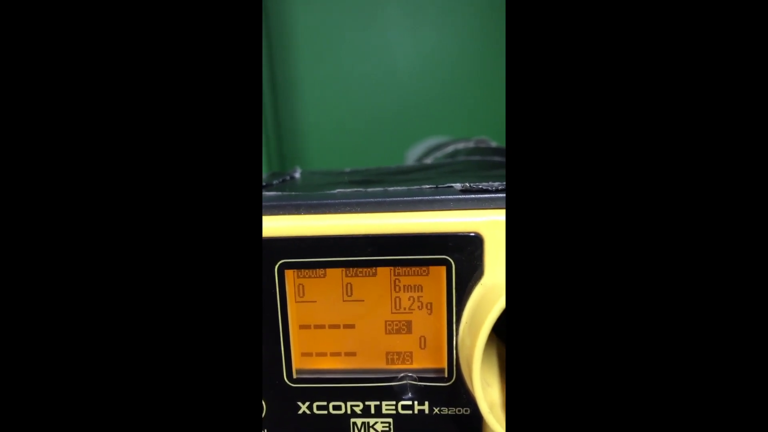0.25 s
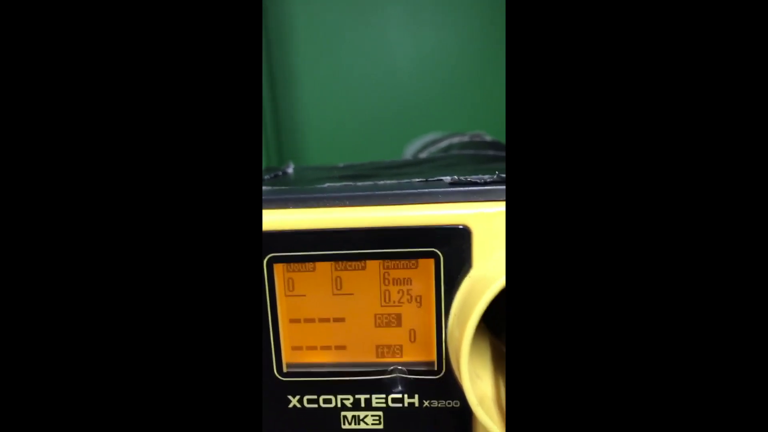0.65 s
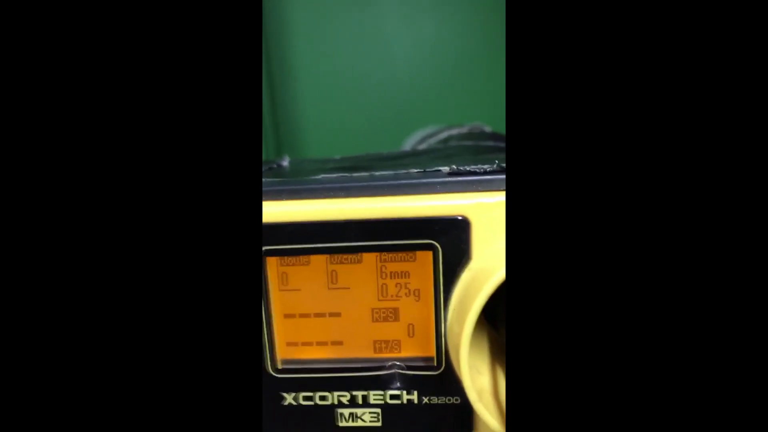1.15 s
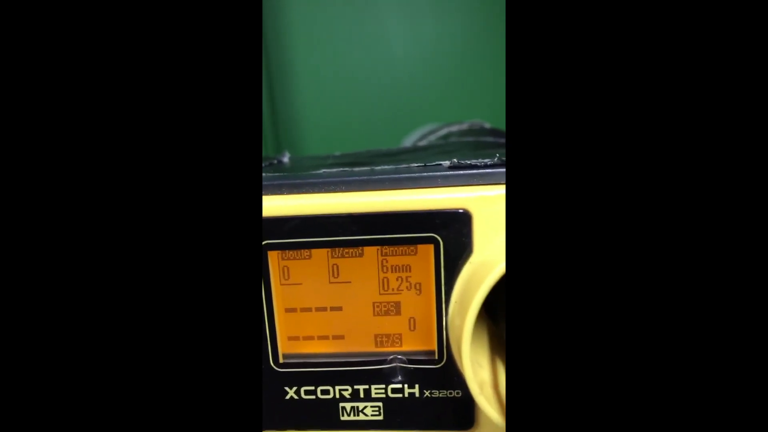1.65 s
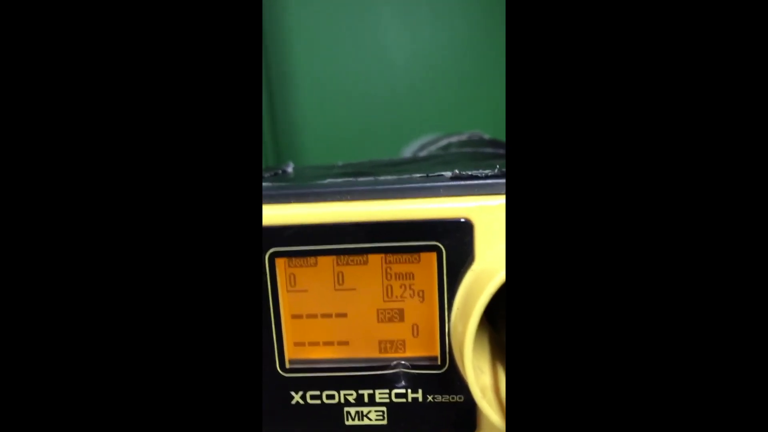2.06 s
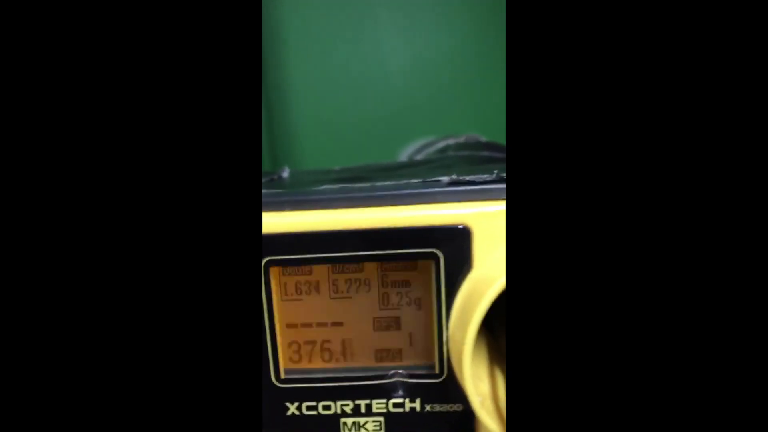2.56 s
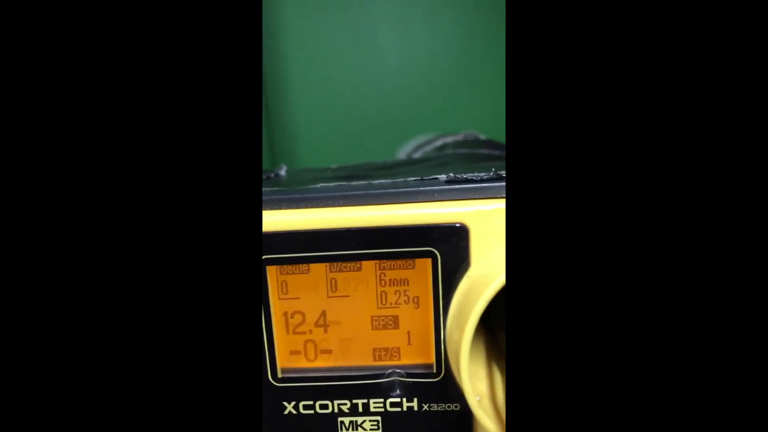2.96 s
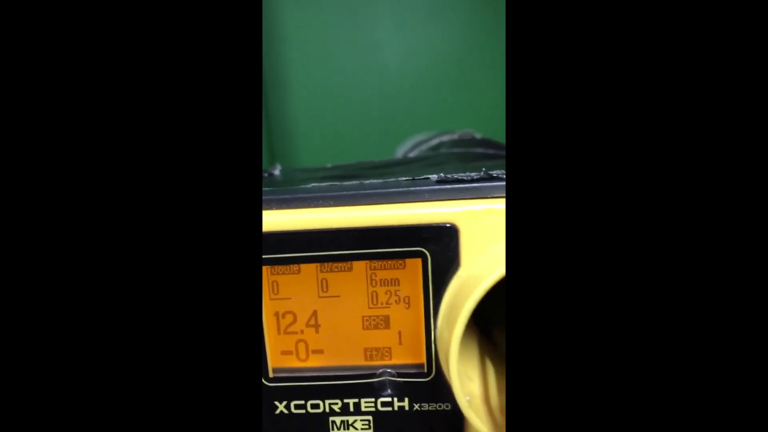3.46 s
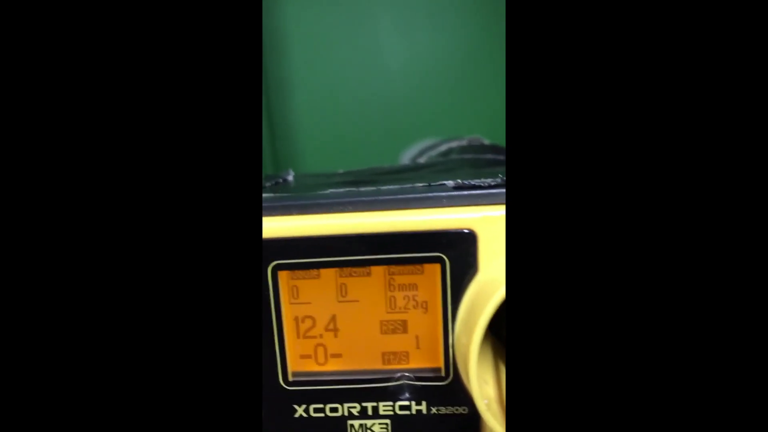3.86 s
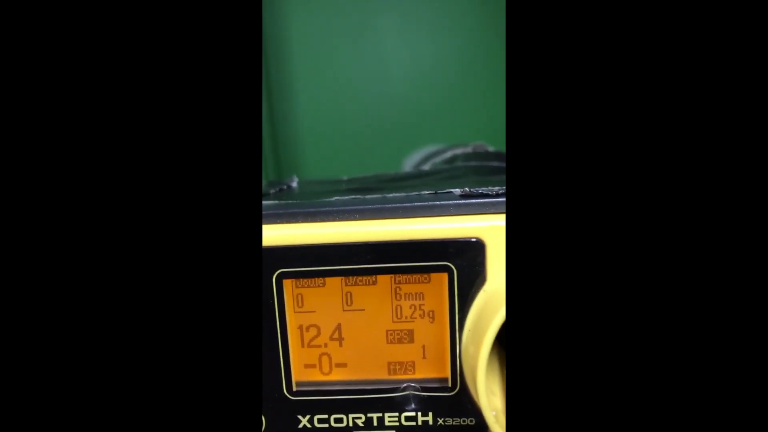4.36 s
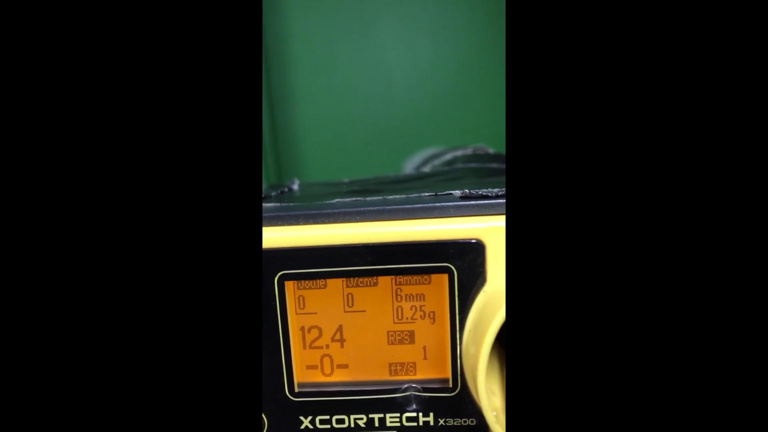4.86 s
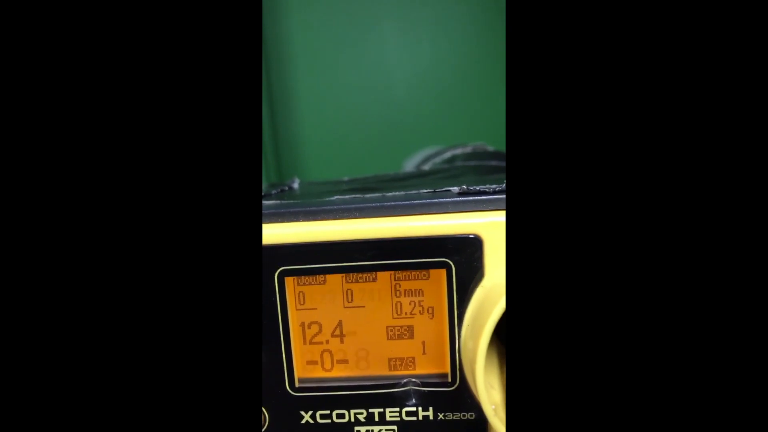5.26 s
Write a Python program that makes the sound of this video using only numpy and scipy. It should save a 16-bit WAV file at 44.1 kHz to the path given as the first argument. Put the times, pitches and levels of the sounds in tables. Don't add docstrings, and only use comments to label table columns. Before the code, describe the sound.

A quiet indoor space holds soft, uneven low rumble and muffled air. From 0 to 1.2 s, an electric pellet rifle is handled: tiny ticks and dull knocks, clearest at about 0.75 and 0.88 s. At 1.95 s the motor engages with a gritty whir and a hard clack, then from 2.04 to 2.56 s eight evenly spaced shots hammer out, about fourteen per second, each a dry piston slam with a short air blast and low buffeting that overloads the close camera microphone. The motor stops by 2.64 s and the background dips, then slowly returns. Between 2.85 and 3.4 s pellets faintly rattle and ping in a metal trap. Clicks and a sharp plastic snap come around 3.73-3.87 s. After quiet rumble, the motor jerks at 5.0 s and one loud crack lands at 5.05 s, followed by a low thump, another dip, faint ringing and a tiny pellet tick at 5.5 s.

```python
import sys
import numpy as np
from scipy import signal
from scipy.fft import rfft, irfft
from scipy.io import wavfile
from scipy.ndimage import uniform_filter1d

SR = 44100
rng = np.random.default_rng(int(sys.argv[2]) if len(sys.argv) > 2 else 0)


def to_linear_factor(level_db):
    exponent = np.asarray(level_db, float) / 20
    return 10 ** exponent


def unload_audio(sound):
    columns = np.transpose(np.atleast_2d(sound))
    steps = np.round(np.clip(columns, -1, 1) * 32767)
    wavfile.write(sys.argv[1], SR, steps.astype(np.int16))


N = 243431


def evened(x):
    return x / np.sqrt(np.mean(x ** 2) + 1e-20)


def read(points, hz):
    f, value = np.transpose(points)
    return np.interp(np.log(hz + 1), np.log(f + 1), value)


def add(mix, s, sound):
    part = mix[round(s * SR):][:len(sound)]
    part += sound[:len(part)]


def coloured(x, points):
    return evened(irfft(rfft(x) * to_linear_factor(read(points, np.fft.rfftfreq(len(x), 1 / SR))), len(x)))


def resonate(x, hz, width_hz):
    turn = np.exp(2j * np.pi * np.cumsum(hz * np.ones(len(x))) / SR)
    r = np.exp(-np.pi * width_hz / SR)
    return 2 * (turn * signal.lfilter([1 - r], [1, -r], x / turn)).real


def wobble(count, span):
    return evened(uniform_filter1d(uniform_filter1d(rng.standard_normal(count), span), span))


def tail(points, modal_db=3.5):
    # f/Hz, t60/s
    room_t60 = [(100, 0.21), (260, 0.39), (700, 0.32), (1840, 0.34), (4850, 0.24)]
    late_db, late_t60_s = -40.5, 1.5
    spectrum = rfft(coloured(rng.standard_normal(SR // 2), points))
    modes = to_linear_factor(modal_db * np.clip(wobble(len(spectrum), span=25), -1, 1))
    hz, t, z = signal.stft(evened(irfft(spectrum * modes)), SR, nperseg=256)
    fade = to_linear_factor(-60 * t / read(room_t60, hz)[:, None]) + to_linear_factor(late_db - 60 * t / late_t60_s)
    return signal.istft(z * fade, SR, nperseg=256)[1]


def shot(slam_db, blast_db, length_s, buffet_db, echo_db):
    # f/Hz, width/Hz, level/dB
    slam_modes = [(3070, 500, -0.5), (6800, 240, -12.5), (8840, 290, -10.5)]
    # f/Hz, level/dB
    blast_spectrum = [(180, -34), (300, -1), (2350, -3.5), (4520, -4), (5000, -10.5), (5370, -5.5),
                      (7720, -12), (8930, -8), (9600, -22), (12500, -48), (21100, -120)]
    # f/Hz, level/dB
    echo_spectrum = [(88, -47), (150, -15), (257, -15), (965, -4.5), (1390, -11), (3100, -3.5),
                     (4160, -7.5), (6110, -1.5), (8800, -1.5), (9600, -17.5), (12500, -46), (21100, -120)]
    hiss_s = 0.022
    t = np.arange(SR // 2) / SR
    noise = rng.standard_normal((3, len(t)))

    def knock(at_s, hold_s):
        return np.exp(-((t - at_s) / hold_s) ** 4)

    def shut(at_s):
        return 1 / (1 + np.exp(np.clip((t - at_s) / 0.001, -50, 50)))

    body = sum(to_linear_factor(db) * evened(resonate(noise[0], hz, w)) for hz, w, db in slam_modes) + 0.3 * noise[0]
    slam = evened(body) * (knock(.0014, .0019) + .8 * knock(.0052, .0008))
    flutter = to_linear_factor(2.3 * wobble(len(t), span=45))
    blast = coloured(noise[1], blast_spectrum) * shut(hiss_s) * np.clip((t - .0065) / 0.0019, 0, 1) * flutter
    gusts = evened(resonate(noise[2], 400, 710)) + evened(resonate(noise[2], 60, 100))
    coarse = 0.56 * evened(resonate(noise[2], 600, 400)) * np.clip(t / length_s, 0, 1) ** 2
    gusts = evened(gusts) + coarse
    buffet = gusts * shut(length_s) * np.clip(t / 0.00098, 0, 1)
    echo = tail(echo_spectrum)[:len(t)] * np.clip(t / 0.011, 0, 1) * (1 + 0.98 * np.exp(-t / 0.016))
    return to_linear_factor(slam_db) * slam + to_linear_factor(blast_db) * blast + to_linear_factor(buffet_db) * buffet + to_linear_factor(echo_db) * echo


def motor(rows, fired_s):
    # f/Hz, level/dB
    gearbox = [(88, -42.5), (150, -13), (481, -10.5), (583, -5.5), (965, -10.5), (1130, -10), (1710, -5.5),
               (3040, -5.5), (6430, -14.5), (8800, -11.5), (9600, -29.5), (12500, -56.5), (21100, -120)]
    # f/Hz, width/Hz, level/dB
    casing = [(991, 25, -3), (3050, 37, 2.5), (3310, 53, -4), (4250, 370, -9), (5260, 26, -10.5),
              (6450, 36, -13.5), (7900, 71, -11.5), (9100, 47, -13.5)]
    # shaft multiple, level/dB
    orders = [(3, -16), (4, -12.5), (9, -8), (10, 1), (14, -17.5), (16, -12.5), (20, -15), (36, -16.5)]
    load_lead_s, load_s, load_db, load_sag = 0.012, 0.014, 8, .04
    s, *columns = np.transpose(rows)
    t = np.arange(s[0], s[-1], 1 / SR)
    gear_db, speed_hz, whine_db = (np.interp(t, s, c) for c in columns)
    load = sum(np.exp(-((t - at + load_lead_s) / load_s) ** 2) for at in fired_s)
    turns = np.cumsum(speed_hz * (1 - load_sag * load + .009 * wobble(len(t), span=100))) / SR
    once_a_turn = 1.3 + np.exp(-(turns % 1) / 0.34)
    chatter = rng.standard_normal(len(t)) * once_a_turn * to_linear_factor(0.9 * wobble(len(t), span=40))
    shell = sum(to_linear_factor(db) * evened(resonate(chatter, hz, 0.83 * w)) for hz, w, db in casing)
    gears = coloured(chatter, gearbox) + .5 * evened(shell)
    whine = 0
    for k, db in orders:
        level = to_linear_factor(db + 2.7 * wobble(len(t), span=200))
        whine = whine + level * np.cos(2 * np.pi * (k * turns + rng.random()))
    return s[0], to_linear_factor(gear_db) * evened(gears) + to_linear_factor(whine_db + load_db * load) * whine


def pull(turning, shots):
    brake_s, brake_db = 0.037, -32
    opening_blast_s, later_blast_s = .033, 0.026
    echo_settled_db, fresh_echo_db, duck_s = -18.5, 4, .1
    s, gear_db, speed_hz, whine_db = turning[-1]
    braked = turning + [(s + brake_s, gear_db + brake_db, speed_hz, whine_db + brake_db)]
    sounds = [motor(braked, [row[0] for row in shots[1:]])]
    for s, slam_db, blast_db, buffet_db in shots:
        since_s = s - shots[0][0]
        echo_db = echo_settled_db + fresh_echo_db * np.exp(-since_s / duck_s)
        length_s = later_blast_s if since_s else opening_blast_s
        sounds.append((s, shot(slam_db, blast_db, length_s, buffet_db, echo_db)))
    return sounds


def firing(mix):
    # t/s, gear noise level/dB, shaft speed f/Hz, pinion whine level/dB
    motor_runs = [
        [(1.945, -43.5, 250, -58), (1.951, -28, 290, -27), (1.984, -12.5, 275, -24), (1.995, -17, 239, -13),
         (2.02, -16, 236, -8.5), (2.04, -13, 215, -33), (2.11, -21.5, 240, -34), (2.27, -39, 267, -43),
         (2.6, -32, 245, -42)],
        [(4.992, -42.5, 250, -58), (4.998, -23, 190, -33.5), (5.018, -19.5, 260, -17), (5.03, -13, 300, -35.5),
         (5.048, -15, 330, -20), (5.08, -19.5, 570, -36), (5.11, -31, 450, -44.5)],
    ]
    # t/s, slam level/dB, air blast level/dB, buffeting level/dB
    shot_runs = [
        [(2.0445, -2.5, -12, -11.5), (2.1195, -1.2, -5.5, -13.5), (2.1925, -5, -8.5, -10.5),
         (2.2655, -4, -7.5, -11), (2.3388, -4, -8, -13), (2.4118, -3, -7.5, -9.5), (2.4855, -6, -7, -15.5),
         (2.5578, -2, -9.5, -12.5)],
        [(5.0502, -0.2, -11, -15.5)],
    ]
    for turning, shots in zip(motor_runs, shot_runs):
        for s, sound in pull(turning, shots):
            add(mix, s, sound)


def swing(db, first_hz, settle_hz):
    t = np.arange(SR // 12) / SR
    turns = np.cumsum(settle_hz + (first_hz - settle_hz) * np.exp(-t / .003)) / SR
    return to_linear_factor(db - 2.9 * turns - 18.0 * turns ** 2) * np.sin(2 * np.pi * turns)


def membrane(mix):
    # t/s, level/dB, first f/Hz, settling f/Hz
    swings = [(2.0475, -0.9, 200, 111.1), (2.062, -4, 200.8, 109.1), (2.0715, -10.5, 113.8, 55.7),
              (2.085, -9, 59.77, 49.9), (2.1475, -11, 90, 70), (2.2225, -9, 80.5, 58),
              (2.364, -14, 79.8, 60), (2.722, -40, 119.9, 71.57), (5.069, -8.5, 39.9, 41.8)]
    # t/s, level/dB, first f/Hz, settling f/Hz
    recoils = [
        (5.0807, -5.5, 51.8, 50),
    ]
    # t/s, level/dB
    closing_gusts = [(2.1432, -1), (2.2158, -3), (2.2862, -8), (2.359, -9), (2.4428, -8), (2.5068, -7.5),
                     (2.579, -11)]
    for s, *row in swings:
        add(mix, s, swing(*row))
    for s, *row in recoils:
        add(mix, s, -swing(*row))
    for s, db in closing_gusts:
        add(mix, s, swing(db, first_hz=340, settle_hz=82))


def click(db, hz, width_hz, echo_db):
    t = np.arange(SR // 4) / SR
    bounces = (rng.random(len(t)) < 900 / SR) * rng.standard_normal(len(t)) * .3 * np.exp(-t / .004)
    bounces[40] = 1
    tick = resonate(resonate(bounces, hz, width_hz), hz, 1.8 * width_hz)
    echo = tail([(100, 0.0061), (9000, 0.005)])[:len(t)]
    spread = resonate(resonate(echo, hz, 4.7 * width_hz), hz, 1.8 * width_hz)
    spread = spread / spread[:400].std() * np.clip(t / .003, 0, 1)
    return to_linear_factor(db) * (tick / tick.max() + to_linear_factor(echo_db - 8.5) * spread)


def handling(mix):
    # t/s, peak level/dB,
    # f/Hz, echo level/dB
    knocks = [(.4160, -41.5, 1650, -10), (.7240, -39.5, 950, -3), (.742, -33, 266, -4.5),
              (.7562, -24.5, 623, -12.5), (1.9876, -6, 1410, -31), (3.272, -46.5, 950, 2),
              (3.8506, -30.5, 1450, -16), (3.859, -34.5, 1104, -13.5), (5.158, -31.5, 796, -8.5)]
    # t/s, peak level/dB, f/Hz, echo level/dB
    ticks = [(.4162, -41, 3000, -13), (.7235, -34.5, 2690, -13), (.7557, -23, 3060, -19.5),
             (.7565, -27.5, 8400, -17), (.7561, -39, 4700, -16), (.788, -38, 2800, -14),
             (.8735, -31.5, 3310, -20), (.8875, -34.5, 2800, -25), (1.1428, -37, 8350, -27),
             (1.9875, 6, 3050, -23), (1.9878, -2.5, 8350, -7), (3.8316, -38, 5370, -8),
             (3.8512, -32.5, 3170, -21), (3.8655, -31, 5310, -12.5)]
    # t/s, peak level/dB, f/Hz, echo level/dB
    snaps = [(.0578, -37.5, 2540, -16), (.871, -37, 6960, -4), (.8864, -17, 7660, -18),
             (1.1423, -29.5, 3250, -20), (2.2195, -2, 3590, -26), (2.4418, 2, 2003, -29),
             (3.7349, -39.5, 6900, -2), (3.8641, -12.5, 8500, -17.5), (5.407, -37.5, 7550, -8.5),
             (5.409, -40, 3930, -9.5)]
    for table, base_hz, share in ((knocks, 20.5, 0.41), (ticks, 490, .07), (snaps, 1700, 0.11)):
        for s, db, hz, echo_db in table:
            add(mix, s, click(db, hz, base_hz + share * hz, echo_db))


def pellet(hiss_db, knock_db):
    t = np.arange(SR // 5) / SR
    rise = np.clip(t / .002, 0, 1)
    hiss = tail([(1500, -24), (5000, -3.5), (9000, -2.5)])[:len(t)] * rise
    knock = tail([(800, -13.0), (2000, -11.0), (3300, -4.0), (5000, -9), (7000, -15.5)])[:len(t)]
    knock = knock * (np.exp(-t / 0.0018) + 0.63) * np.sqrt(rise)
    return to_linear_factor(hiss_db) * hiss + to_linear_factor(knock_db) * knock


def ping(db, tilt_db):
    # f/Hz, level/dB, t60/s
    trap_modes = [(4460, 0.5, 0.093), (5900, -6, 0.081), (6720, -20, .06), (7425, -3, 0.073),
                  (8490, -11, 0.061)]
    t = np.arange(SR // 5) / SR
    strike = rng.standard_normal(len(t)) * np.exp(-t / 0.0043)
    total = np.zeros(len(t))
    for hz, level_db, t60_s in trap_modes:
        mode = resonate(resonate(strike, hz, 5.5 / t60_s), hz, 5.5 / t60_s)
        total += to_linear_factor(db + level_db + tilt_db * np.log2(hz / 4457)) * mode / mode[:800].std()
    return total


def ring(hz, db, length_s):
    t = np.arange(round(length_s * SR)) / SR
    pair = np.sin(2 * np.pi * hz * t) + .22 * np.sin(2 * np.pi * 1.045 * hz * t)
    level = to_linear_factor(db + 2.5 * wobble(len(t), span=200) - 13 * t / length_s)
    return level * pair * signal.windows.tukey(len(t), .2)


def rattle(mix):
    # t/s, hiss level/dB, dull knock level/dB
    bounce_rows = [(2.8449, -72, -51.5), (2.876, -65, -53), (2.902, -60, -52.5), (2.9352, -59, -53.5),
                   (2.9861, -46.5, -68), (2.9975, -47, -65), (3.0689, -44.5, -68), (3.1218, -47.5, -52),
                   (3.2225, -51.5, -51), (3.2355, -44.5, -50.5), (3.2729, -48, -48.5), (3.3023, -47, -54),
                   (3.3707, -50.5, -60.5), (3.392, -66, -45), (3.415, -56, -51), (5.513, -66.5, -63.5)]
    # t/s, level/dB, brightness/(dB per octave)
    ping_rows = [(2.879, -56.5, -20), (2.9861, -57, 6), (2.9975, -61, 16), (3.072, -58.5, -9),
                 (3.1218, -70.5, -11.5), (3.3707, -52.5, -16), (5.513, -52, -23)]
    # t/s, f/Hz, level/dB, length/s
    ring_rows = [(.7570, 5700, -57, .115), (1.1430, 5700, -59, .08), (1.9550, 930, -28, .014),
                 (2.7750, 3150, -57, .075), (2.9870, 2500, -59, .03), (4.9970, 630, -25, .04),
                 (5.0020, 985, -23, .045), (4.9950, 790, -25, .03), (5.1320, 3150, -45, .035),
                 (5.1620, 880, -49, .05), (5.1600, 3150, -58, .13), (5.2600, 5900, -67, .07),
                 (5.2750, 3150, -57, .075), (5.3600, 3150, -61, .08), (5.4300, 3150, -62, .08),
                 (5.4580, 6050, -63, .06)]
    for table, source in ((bounce_rows, pellet), (ping_rows, ping), (ring_rows, ring)):
        for s, *row in table:
            add(mix, s, source(*row))


def background():
    # f/Hz, level/dB
    rumble_spectrum = [(12, -38.5), (20, -13.5), (34, -5), (54, 4), (76, -8.5), (107, -8), (140, -2.5),
                       (166, -16), (228, -14), (296, -17), (323, -24.5), (362, -17), (400, -26.5),
                       (520, -51), (880, -120)]
    # f/Hz, level/dB
    air_spectrum = [(180, -37.5), (300, -5.5), (419, -6), (619, -8), (686, -7), (890, -7.5), (1070, -5),
                    (2030, -17), (2600, -17.5), (4390, -27.5), (8670, -35.5), (9600, -52), (12500, -82),
                    (21100, -120)]
    # t/s, level/dB
    rumble_swell = [(0, -39.5), (.7, -42.5), (1.25, -40), (1.9, -41.5), (3.5, -40.5), (4.3, -43.5),
                    (4.6, -40.5), (5.0, -39)]
    # starts closing t/s, closed t/s, reopens t/s, depth level/dB
    ducks = [
        (2.58, 2.749, 2.853, -16),
        (5.03, 5.16, 5.25, -14),
    ]
    recover_db_per_s, rumble_duck, air_db = 22.5, 1.65, -52
    t = np.arange(N) / SR
    duck_db = 0
    for closing_s, closed_s, reopen_s, db in ducks:
        times_s = [closing_s, closed_s, reopen_s, reopen_s - db / recover_db_per_s]
        duck_db = duck_db + np.interp(t, times_s, [0, db, db, 0])
    rumble_db = np.interp(t, *np.transpose(rumble_swell)) + rumble_duck * duck_db + 1.4 * wobble(N, span=2000)
    rumble = coloured(rng.standard_normal(N), [(8, -40.5)] + rumble_spectrum) * to_linear_factor(rumble_db)
    return rumble + coloured(rng.standard_normal(N), air_spectrum) * to_linear_factor(air_db + duck_db)


def scene():
    mix = background()
    firing(mix)
    membrane(mix)
    handling(mix)
    rattle(mix)
    return mix[None]


def thinned(x, share, above_hz):
    hz, t, z = signal.stft(x, SR, nperseg=1024)
    power = uniform_filter1d(uniform_filter1d(abs(z) ** 2, size=6, axis=1), size=3, axis=2)
    level = np.log(power + 1e-16)
    around = uniform_filter1d(level, size=31, axis=1)
    lost = (level < np.log(share) + around) & (hz[:, None] > above_hz)
    return signal.istft(z * (1 - .9 * lost), SR, nperseg=1024)[1][:, :N]


def band_limit(x):
    return signal.sosfilt(signal.butter(12, 16260, fs=SR, output="sos"), x)


def record(dry):
    # f/Hz, level/dB
    pass_band = [(10, -24), (30, -3), (45, 0.5), (9000, -0.5), (9300, -8.5), (9600, -31), (10000, -62.5),
                 (10400, -110)]
    narrow = irfft(rfft(dry) * to_linear_factor(read(pass_band, np.fft.rfftfreq(N, 1 / SR))), N)
    clipped = np.clip(thinned(narrow, share=.62, above_hz=4300), -1, 1)
    lowpass = signal.firwin(301, 15750, window=("kaiser", 6), fs=SR)
    wide = signal.oaconvolve(clipped, lowpass[None], "same")
    return band_limit(np.clip(wide, -1, 1))


dry = scene()
out = record(dry)
unload_audio(out)
```